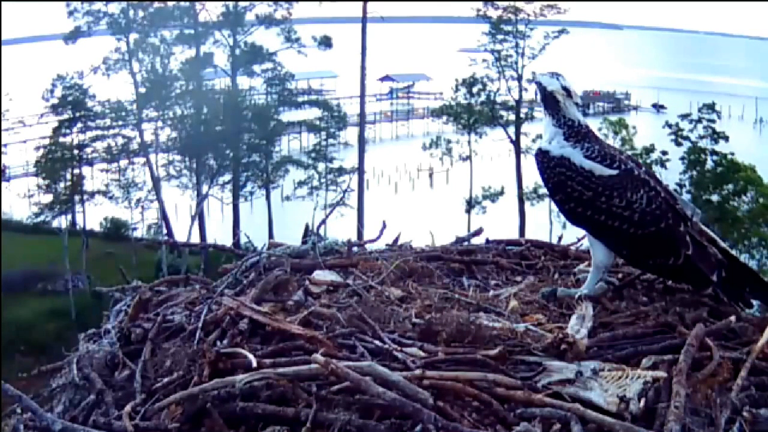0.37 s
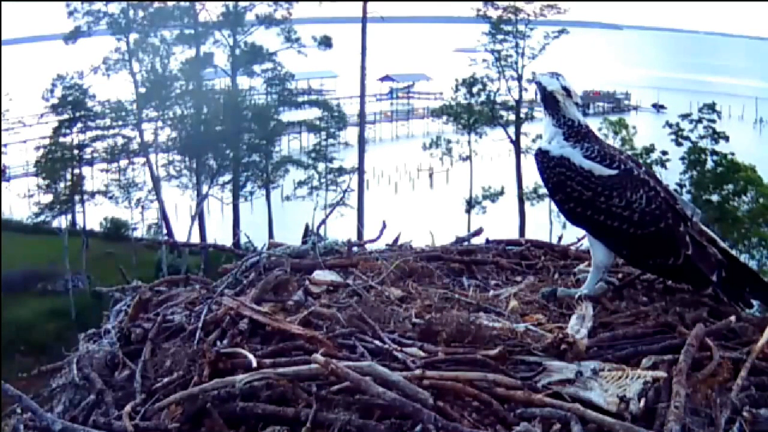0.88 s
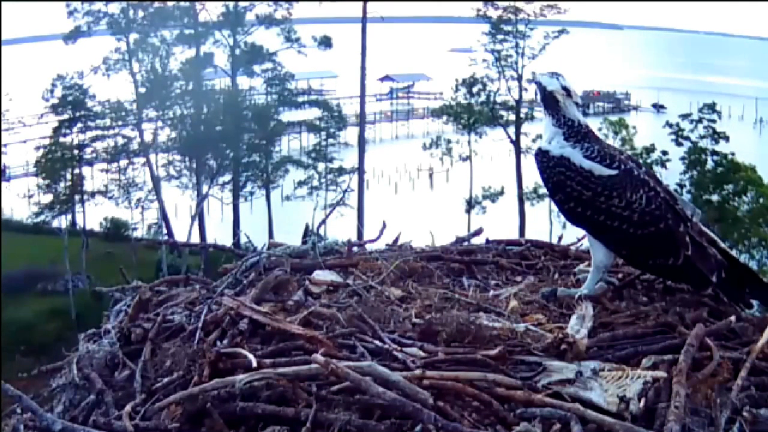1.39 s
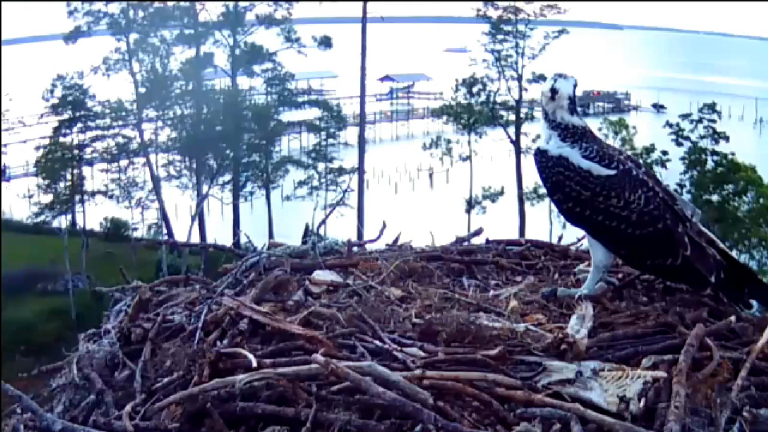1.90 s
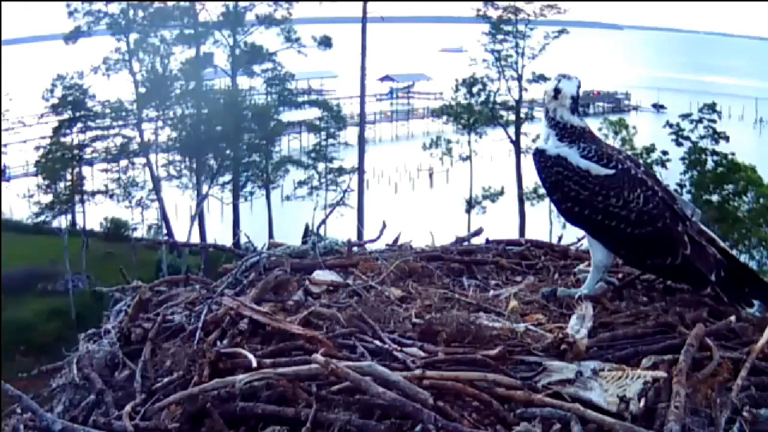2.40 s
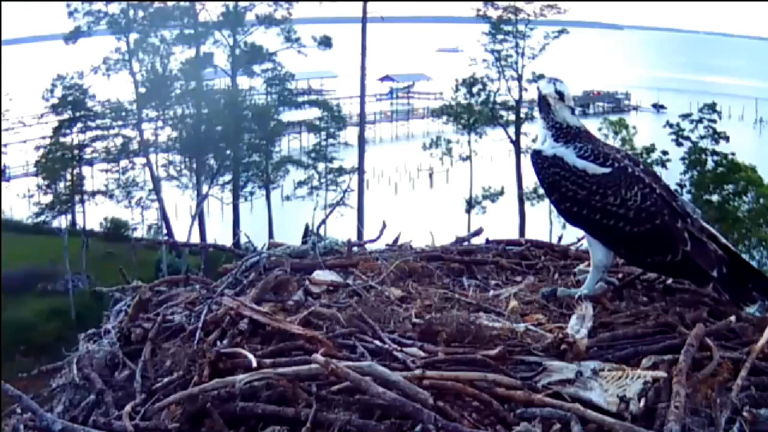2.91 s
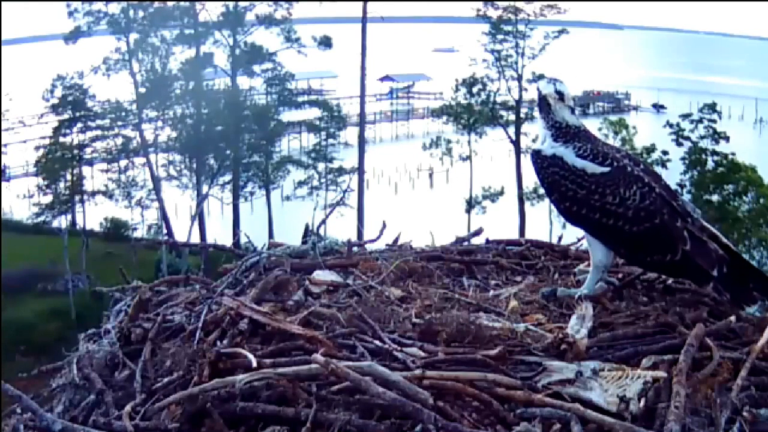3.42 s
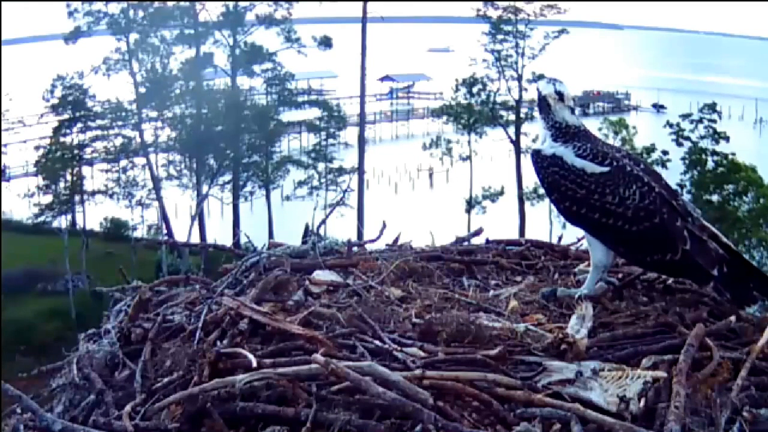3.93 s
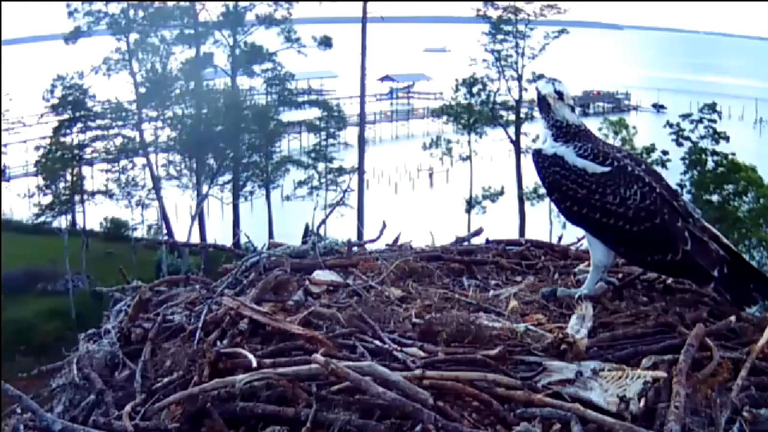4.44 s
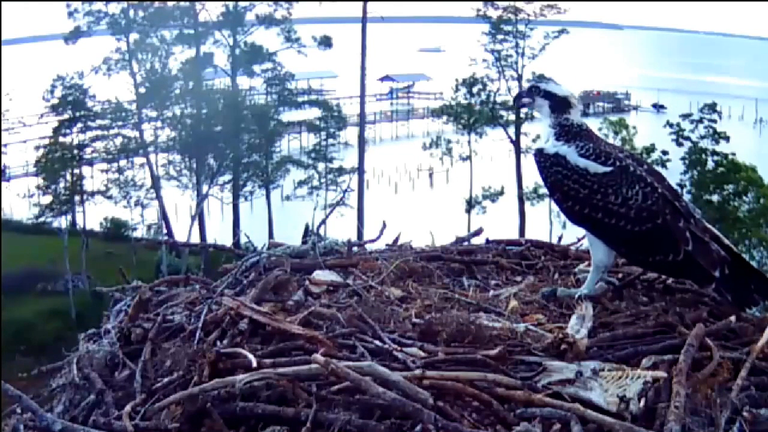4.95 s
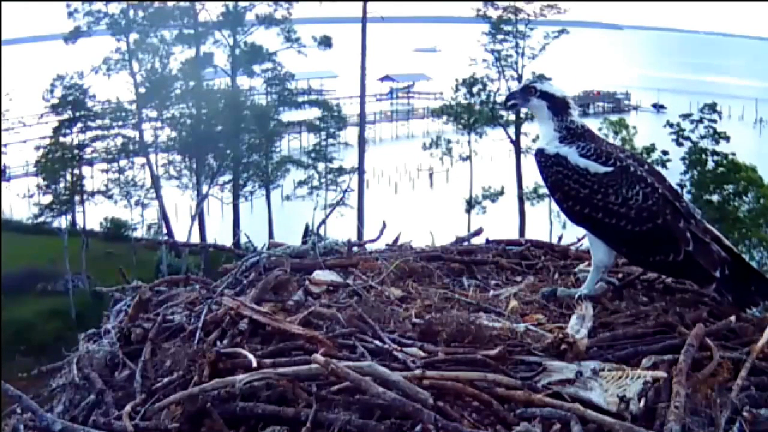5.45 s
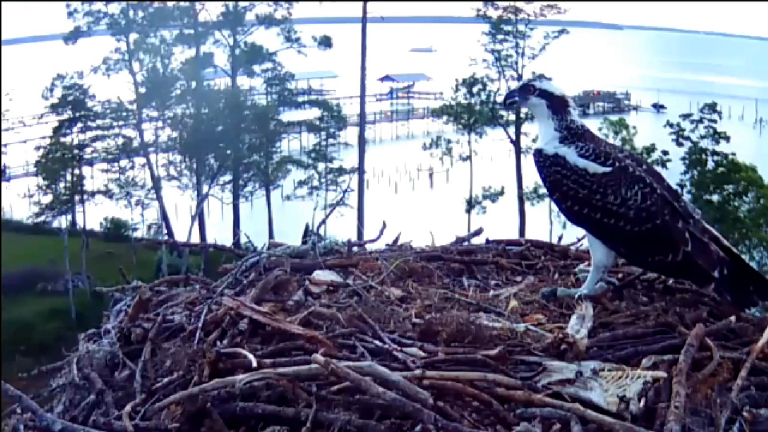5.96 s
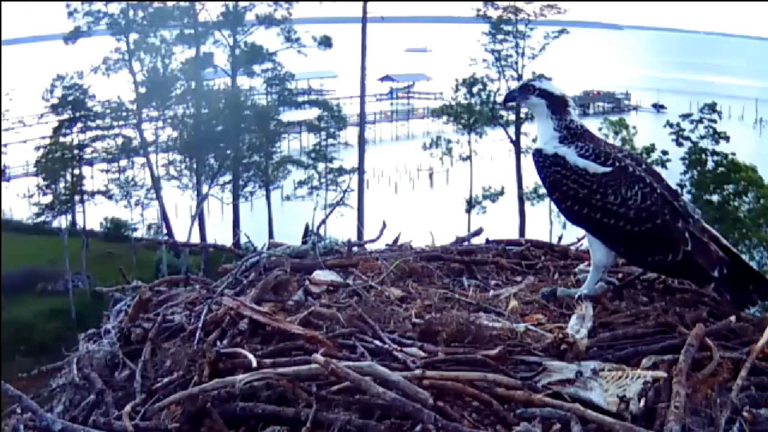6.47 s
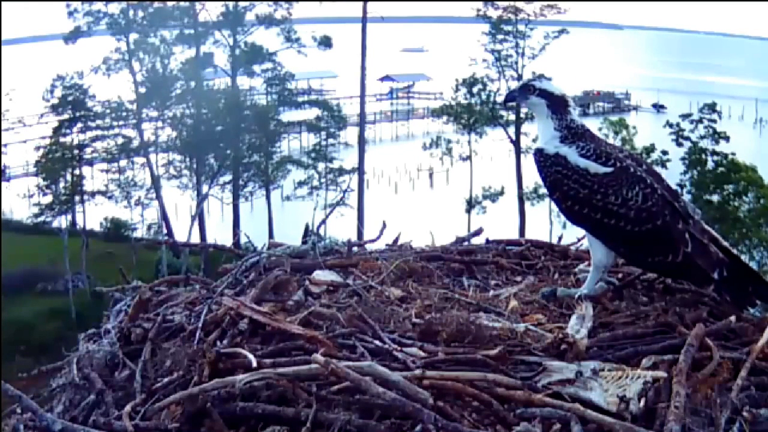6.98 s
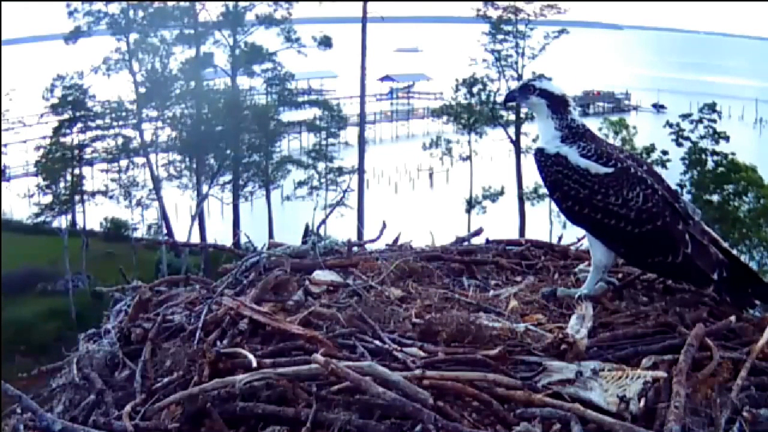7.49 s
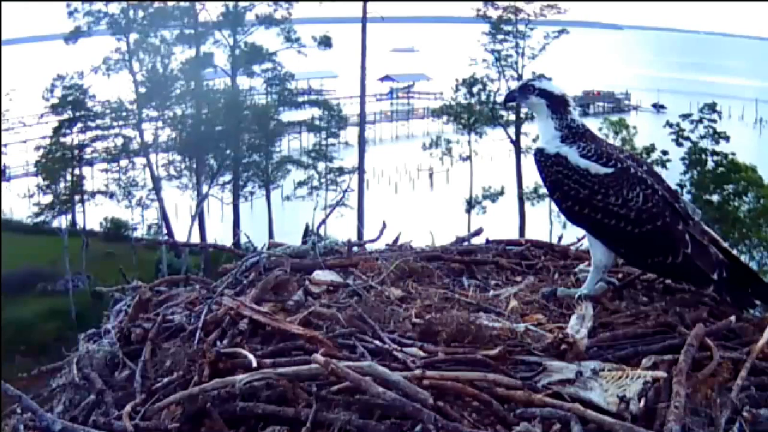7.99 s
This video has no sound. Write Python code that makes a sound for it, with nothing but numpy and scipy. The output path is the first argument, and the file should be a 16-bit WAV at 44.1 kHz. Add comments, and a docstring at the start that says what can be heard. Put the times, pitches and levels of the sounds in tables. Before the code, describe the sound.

A faint, wavering motor drone sounds in the distance under soft outdoor air and steady hiss, with a few thin bird whistles far off among trees. At about 1.3 seconds a young osprey starts begging close by, much louder than everything else: a fast, even run of high whistled chirps, six or seven a second. Each slurs upward, most break into a higher register, and a beating second tone makes them hoarse. Short bursts of bright, distorted crackle ride on the loud chirps. The run ends at about 4.2 seconds. The drone and air continue with a faint high shimmer, perhaps insects. Distant birds whistle again from about 4.8 to 5.5 seconds, and more faintly from 7.3 to 8. Everything in the background but the hiss drops away briefly around 0.4, 1.2, 4.3 to 4.8 and 6.2 to 6.8 seconds.

```python
"""A distant motor drones over faint outdoor air and hiss, and birds whistle far off among trees;
all but the hiss drops away briefly now and then. After a second or so a young osprey begs on its nest:
a fast run of whistled chirps that slur upward, most breaking into a higher register, made hoarse by a
beating second voice. Short bursts of bright, distorted crackle ride on the loud chirps. At about four
seconds the run ends, leaving the drone, more far whistles and a high shimmer, perhaps of insects."""
import sys
import numpy as np
from scipy import signal
from scipy.fft import rfft, irfft, next_fast_len
from scipy.io import wavfile
from scipy.ndimage import uniform_filter1d, minimum_filter1d, map_coordinates

SR = 44100
rng = np.random.default_rng(int(sys.argv[2]) if len(sys.argv) > 2 else 0)


def generate_wav(sig):
    """Save sig (samples, or channels by samples) to the path in sys.argv[1] as 16-bit PCM at SR."""
    pcm = np.round(np.clip(np.atleast_2d(sig).T, -1, 1) * 32767).astype(np.int16)
    wavfile.write(sys.argv[1], SR, pcm)


N = 361458
TIME = np.arange(N) / SR

# bright crackle with a faint low puff that accompanies the loud chirps: frequency_hz, relative_density_db
CRACKLE_SPECTRUM = [(30, -1), (120, -0.5), (700, -6), (1500, 1), (3000, 8), (4500, 7), (7000, 6.5),
                    (10000, 9.5), (11000, -34.5)]
# the narrower fuzz beneath that crackle: frequency_hz, relative_density_db
FUZZ_SPECTRUM = [(1200, -45), (1750, -11), (2200, -6.5), (2800, -0.5), (3800, 3), (4300, -34)]


def amp(db):
    """The decibel scale: 20 dB is a factor of ten in amplitude."""
    return 10 ** (np.asarray(db) / 20)


def unit(x):
    """Normalisation to rms 1."""
    return x / np.sqrt(np.mean(x ** 2) + 1e-20)


def along(points, hz):
    """Interpolation of (frequency_hz, value) rows on a logarithmic frequency axis."""
    frequencies, values = np.transpose(points)
    return np.interp(np.log(hz + 1), np.log(frequencies), values)


def curve(rows):
    """Linear interpolation of (time_s, value) rows at every sample."""
    return np.interp(TIME, *np.transpose(rows))


def wobble(rate, size=N):
    """Random modulation: a smooth curve through rate Gaussian knots a second."""
    knots = rng.standard_normal(size // 8)
    return map_coordinates(knots, [np.arange(size) * rate / SR], mode="wrap")


def filtered(x, response):
    """Linear filtering: the spectrum is multiplied by a frequency response."""
    size = next_fast_len(N + 8192)
    return irfft(rfft(x, size) * response(np.fft.rfftfreq(size, 1 / SR)), size)[:N]


def noise(spectrum):
    """Spectral shaping of white noise, at rms 1."""
    return unit(filtered(rng.standard_normal(N), lambda hz: amp(along(spectrum, hz))))


def tone(hz):
    """A sinusoid of rms 1 whose phase is the integral of its frequency."""
    return np.sqrt(2) * np.sin(2 * np.pi * np.cumsum(hz) / SR)


def window(start):
    """A time window: the samples and times of a quarter second around a note."""
    first = max(round((start - .06) * SR), 0)
    span = slice(first, first + SR // 4)
    return span, TIME[span]


def motor(rumble_db=-3.0, line_db=0.8, waver_db=3.2, drift=.009):
    """Rotation harmonics: a far engine sounds wavering multiples of its turning rate over a rumble."""
    # the drone's strength: time_s, level_db
    levels = [(0, -43), (.18, -40.5), (.37, -49.5), (.72, -44.5), (.95, -48.5), (2.25, -43), (2.8, -45.5),
              (3.72, -46.5), (4, -42), (4.2, -46), (4.62, -45), (5.75, -48.5), (6.08, -42), (6.4, -49),
              (7.65, -48.5), (7.95, -45.5), (8.2, -46)]
    # the second order, the strongest line, sinks slowly: time_s, pitch_hz
    second_order = [(0, 307), (1, 304), (2.2, 300), (2.9, 301), (4.1, 297), (4.9, 291), (6.1, 293),
                    (7, 290), (8.2, 291)]
    # spectral lines: order, relative_level_db
    orders = [(1, -15), (2, -5), (3, -28)]
    # the rumble: frequency_hz, relative_density_db
    rumble_spectrum = [(30, -44), (132, -42), (148, -7), (185, -7.5), (240, 0), (320, -1.5), (400, -11.5),
                       (520, -21), (800, -34), (1500, -61)]
    turning_hz = curve(second_order) / 2
    lines = np.zeros(N)
    for order, db in orders:
        line = tone(order * turning_hz * (1 + drift * wobble(30)))
        lines += amp(db) * unit(line * amp(waver_db * wobble(16)))
    return amp(curve(levels)) * (amp(line_db) * lines + amp(rumble_db) * noise(rumble_spectrum))


def air():
    """Modulated noise: a broad rush of shore and trees, and a narrow shimmer that slowly grows."""
    # the rush: frequency_hz, relative_density_db
    rush_spectrum = [(100, -29), (500, -17), (850, -17), (1020, -3.5), (1450, -5.5), (2050, 1), (2500, 0),
                     (3200, -1), (3850, 0.5), (4100, -4.5), (7500, -12), (9000, -54)]
    # the shimmer, perhaps insects: frequency_hz, relative_density_db
    shimmer_spectrum = [(3000, -36), (3350, -10.5), (3600, -2.5), (3800, -3), (4000, -21.5), (4300, -55)]
    rush_db = curve([(0, -53.5), (1.2, -52.5), (4.6, -51), (6.2, -54), (8.2, -54)])
    shimmer_db = curve([(0, -73), (1.2, -59), (4.6, -56.5), (6.2, -55.5), (7.7, -54), (8.2, -57)])
    rush = amp(rush_db + 0.85 * wobble(5.0)) * noise(rush_spectrum)
    shimmer = amp(shimmer_db + wobble(11)) * noise(shimmer_spectrum)
    return rush + shimmer


def hiss(level_db=-53):
    """Stationary broadband noise, strongest in the treble."""
    # the hiss: frequency_hz, relative_density_db
    spectrum = [(30, -20), (800, -17.5), (1300, -8.5), (2200, 0), (4000, 3), (7500, 4), (8800, -1.5),
                (10500, -15.5)]
    return amp(level_db) * noise(spectrum)


def far_birds(arch_hz=145, flutter_db=2.6, waver_hz=40):
    """Propagation fluctuation: the long path through the trees makes faint arched whistles unsteady."""
    # distant whistles: start_s, length_s, middle_hz, glide_hz, relative_level_db
    whistles = [(.018, 0.067, 3120, 0, -56.5), (.221, .073, 2600, 50, -58), (0.465, .07, 2720, 0, -57.5),
                (0.671, 0.1, 2650, 0, -56), (.849, 0.084, 2700, 200, -55), (1.064, 0.059, 2760, 90, -53),
                (1.347, .041, 2740, 120, -54.5), (4.774, 0.079, 2900, 0, -48), (4.971, .09, 2975, 60, -46),
                (4.98, .07, 2170, 100, -58), (5.17, .12, 2220, 150, -53), (5.202, 0.072, 3010, -90, -45.5),
                (5.397, .079, 2140, 260, -50), (5.452, .048, 2880, -340, -46), (7.328, .1, 1970, 0, -60),
                (7.749, .14, 2200, 80, -60), (8.002, .06, 2130, 80, -58)]
    out = np.zeros(N)
    for start, length, middle_hz, glide_hz, db in whistles:
        span, t = window(start)
        progress = np.clip((t - start) / length, 0, 1)
        hz = middle_hz + glide_hz * (progress - .5) - arch_hz * (2 * progress - 1) ** 2
        envelope = amp(db) * np.sqrt(abs(np.sin(np.pi * progress)))
        out[span] += envelope * tone(hz + waver_hz * wobble(244, size=len(t)))
    return out * unit(amp(flutter_db * wobble(90)))


def trees(x):
    """Diffuse reverberation: scattering by trees, as convolution with exponentially decaying noise."""
    # reverberation time among trees: frequency_hz, t60_s
    decay_times = [(500, .4), (2200, 0.89), (4000, 0.24), (10000, 0.3)]
    hz, t, bands = signal.stft(rng.standard_normal(SR // 2), SR, nperseg=256)
    decay = amp(-60 * t / along(decay_times, hz)[:, None])
    tail = signal.istft(bands * decay, SR, nperseg=256)[1]
    return signal.fftconvolve(x, tail / np.linalg.norm(tail))[:N]


def lull_gain(lull_db=-18):
    """Amplitude gating: a gain that drops abruptly in each lull and then returns."""
    # lulls in the background: start_s, end_s
    lulls = [(.422, .471), (1.125, 1.308), (1.396, 1.453), (4.259, 4.569), (4.666, 4.775), (6.23, 6.536),
             (6.63, 6.685), (6.773, 6.826)]
    quiet = sum((TIME > start) & (TIME < end) for start, end in lulls)
    return uniform_filter1d(np.where(quiet, amp(lull_db), 1), size=80)


def chirp(t, row, onset_hz=1860, climb_hz=305, fallback_hz=1880, scoop_s=.006, overlap_s=.006,
          attack_db_per_s=3900, release_db_per_s=2200, accent_db=2, accent_s=.0054,
          jitter=.0042, flutter_db=.55, shudder_db=7, catch_db=-6, ring_db=-6):
    """Frequency modulation: a slur rises, may break register, then sags. Returns sound and envelope."""
    start, snap, end = np.cumsum(row[:3])
    crest_hz, upper_hz, opening_db, full_db, second_db = row[3:-1]
    rise = np.clip((t - start) / (snap - start), 0, 1)
    fall = np.clip((t - snap) / (end - snap), 0, 1)
    leap = np.clip((upper_hz - crest_hz) / 80, 0, 1)  # 0 = unbroken arch, 1 = full break
    # the arch sags far if unbroken, little after a break
    sag_hz = np.interp(leap, [0, 1], [345, 148.5])
    sag_db = np.interp(leap, [0, 1], [12.5, 2])
    # every note scoops up from the same pitch; an unbroken slur bows over toward its crest
    slur_hz = crest_hz - climb_hz * (1 - rise) ** (1 + .25 * (1 - leap))
    scoop = np.exp(-np.maximum(t - start, 0) / scoop_s) * (1 - rise)
    low_hz = slur_hz + (onset_hz - crest_hz + climb_hz) * scoop
    hz = np.where(t < snap, low_hz, upper_hz - sag_hz * fall ** 2.23)
    # as the pressure goes, a broken voice falls back into its low register
    hz += leap * (fallback_hz - upper_hz + sag_hz) * np.clip((t - end - .005) / .0035, 0, 1)
    hz = uniform_filter1d(hz, size=40) * (1 + jitter * wobble(599.4, size=len(t)))
    attack = attack_db_per_s * np.maximum(start + .0023 - t, 0)
    accent = accent_db * np.exp(-((t - start) / accent_s - 1) ** 2)
    swell = (full_db - opening_db) * (1 + np.tanh((rise - .56) / .19)) / 2
    release = release_db_per_s * np.maximum(t - end + .0016, 0)
    db = opening_db - attack + accent + swell - sag_db * fall ** 2 - release
    # the tone catches for an instant at a break, and hoarse notes shudder
    catch = leap * catch_db * np.exp(-((t - snap) / .0014) ** 2)
    shudder = (flutter_db + shudder_db * amp(second_db - full_db)) * wobble(384.4, size=len(t))
    envelope = amp(db + catch + shudder)
    # the low register rings on briefly after a break and beats with the high one
    handover = (1 + np.tanh((t - snap) / .0007)) / 2
    ring = leap * amp(full_db + ring_db) * handover * np.exp(-abs(t - snap) / overlap_s) * tone(low_hz)
    return envelope * (tone(hz) + octave(hz, crest_hz)) + ring, envelope


def octave(hz, crest_hz, edge_hz=3980, loss_db_per_hz=.035, fade_db_per_hz=.065):
    """The second harmonic flashes at the lowest pitches, then turns back at a treble edge and fades."""
    excess_hz = 2 * hz - edge_hz
    peak_db = -1.5 - loss_db_per_hz * max(crest_hz - 2200, 0)  # weaker in higher slurs
    fade_db = fade_db_per_hz * np.maximum(excess_hz + 80, 0)
    return amp(peak_db - fade_db) * tone(edge_hz - abs(excess_hz))


def second_voice(t, row, rest_hz=2050, pushed_hz=2280, lead_s=.026, linger_s=.014, waver_hz=30,
                 attack_db_per_s=2200, rise_db_per_s=270, fade_db_per_s=480, flutter_db=2.5):
    """Beating: a thin whine, likely the other side of the syrinx, leads and roughens the whistle."""
    start, snap, end = np.cumsum(row[:3])
    pushed_db, rest_db = row[-2:]
    push = np.interp(t, [start, start + .0071, snap, end], [0, 1, 1, 0])
    attack = attack_db_per_s * np.maximum(start - lead_s - t, 0)
    rise = rise_db_per_s * np.maximum(start - t, 0)
    fade = fade_db_per_s * np.maximum(t - end, 0)
    db = rest_db + push * (pushed_db - rest_db) - attack - rise - fade
    hz = np.interp(t, [start, snap, end + linger_s], [rest_hz, pushed_hz, rest_hz])
    hz += waver_hz * wobble(199.2, size=len(t))
    return amp(db + flutter_db * wobble(147, size=len(t))) * tone(hz)


def osprey(crackle_db=-28, fuzz_db=-26.5):
    """Biphonation: two voices sound in each chirp; faint crackle and fuzz follow the whistle's level."""
    # the begging run: start_s, slur_s, arch_s, slur_crest_hz, arch_top_hz, opening_db, full_db,
    # second_voice_pushed_db, second_voice_rest_db
    chirps = [(1.308, .001, .011, 2420, 2500, -31, -26, -52, -72),
              (1.477, 0.016, .032, 2110, 2580, -25, -15.5, -37, -57),
              (1.6206, .0264, .024, 2170, 2590, -24, -14.5, -39, -68),
              (1.7665, .0305, .027, 2200, 2615, -23.5, -14.5, -36, -53),
              (1.912, .041, .016, 2270, 2604, -24, -17.5, -26, -37),
              (2.058, .045, .027, 2220, 2215, -21.5, -15, -38, -45),
              (2.213, .043, .027, 2255, 2235, -25, -18, -29, -35),
              (2.362, .046, .027, 2217, 2215, -24.5, -14.5, -40, -34),
              (2.516, .047, .029, 2240, 2200, -25, -17, -30, -34),
              (2.671, .039, .023, 2295, 2700, -21.5, -14.5, -34, -32),
              (2.8236, .0464, .024, 2290, 2715, -27.5, -13, -30, -35),
              (2.982, .042, .026, 2290, 2740, -25.5, -14, -39, -35),
              (3.139, .042, 0.021, 2295, 2680, -24, -14.5, -36, -38),
              (3.2925, .0355, .038, 2283, 2770, -26, -14.5, -35, -35),
              (3.448, 0.038, .032, 2330, 2795, -24.5, -14.5, -37, -32),
              (3.5985, .0435, 0.028, 2330, 2810, -28, -14, -32, -36),
              (3.756, .041, .032, 2345, 2805, -29, -13.5, -36, -40),
              (3.917, .047, .023, 2331, 2751, -25.5, -14, -39, -34),
              (4.084, .038, .024, 2346, 2740, -24, -14, -33, -30.5)]
    voice, strength = np.zeros((2, N))
    for row in chirps:
        span, t = window(row[0])
        whistle, envelope = chirp(t, row)
        voice[span] += whistle + second_voice(t, row)
        strength[span] += envelope
    crackle = amp(crackle_db) * noise(CRACKLE_SPECTRUM)
    fuzz = amp(fuzz_db) * noise(FUZZ_SPECTRUM)
    return voice + strength * (crackle + fuzz)


def limiter(x, ceiling=0.31):
    """Peak limiting: the gain ducks within milliseconds to hold the loudest whistles level."""
    needed = np.minimum(1, ceiling / (abs(x) + 1e-9))
    return x * uniform_filter1d(minimum_filter1d(needed, size=260), size=260)


def crackle_bursts(swell_s=.0105, fade_s=.0075, roughness_db=3.2, crackle_db=4.7, fuzz_db=4.5):
    """Roughness from fast amplitude modulation: bright noise bursts over fuzz, sounding like overload."""
    # short bursts of distorted crackle on the loud chirps: peak_s, relative_level_db
    bursts = [(1.525, -36), (1.656, -41.5), (1.827, -40), (1.961, -34.5), (2.263, -42), (2.725, -35),
              (2.889, -37.5), (3.072, -46), (3.192, -33), (3.362, -36), (3.538, -45.5), (3.669, -38.5),
              (3.833, -41), (4.009, -45), (4.142, -38.5), (4.178, -51)]
    envelope = np.zeros(N)
    for peak, db in bursts:
        span, t = window(peak)
        width_s = np.where(t < peak, swell_s, fade_s)
        envelope[span] += amp(db) * np.exp(-((t - peak) / width_s) ** 2 / 2)
    crackle = unit(noise(CRACKLE_SPECTRUM) * amp(roughness_db * wobble(1500)))
    return envelope * (amp(crackle_db) * crackle + amp(fuzz_db) * noise(FUZZ_SPECTRUM))


def scene():
    """Superposition of the near chirps and crackle, the background with its lulls, and a steady hiss."""
    near = limiter(osprey()) + crackle_bursts()
    far = far_birds()
    background = motor() + air() + amp(2.5) * far + amp(-11.5) * trees(far) + amp(-32.5) * trees(near)
    return (near + lull_gain() * background + hiss())[None]


def record(dry, clock_hz=48000, cutoff_hz=10900):
    """Timing error: samples slip to a faster clock's nearest tick, adding side tones; then a low-pass."""
    n = np.arange(N)
    slip_samples = ((n * clock_hz / SR) % 1 - .5) * SR / clock_hz
    sampled = map_coordinates(dry[0], [n - slip_samples], mode="nearest")
    return filtered(sampled, lambda hz: 1 / np.sqrt(1 + (hz / cutoff_hz) ** 160))[None]


dry = scene()
out = record(dry)
generate_wav(out)
```